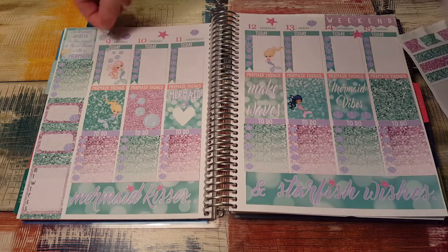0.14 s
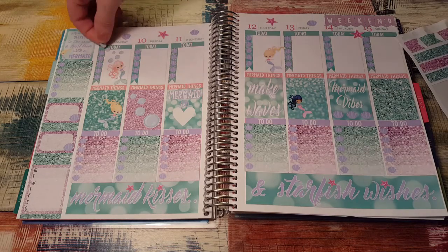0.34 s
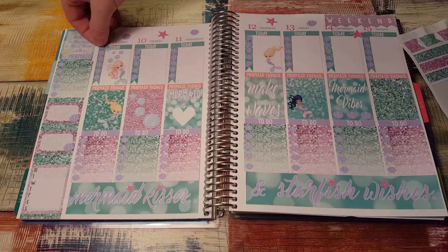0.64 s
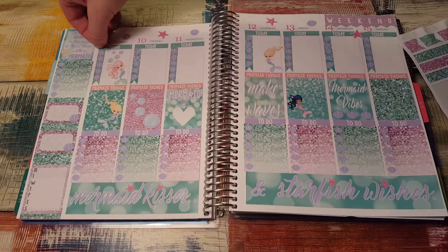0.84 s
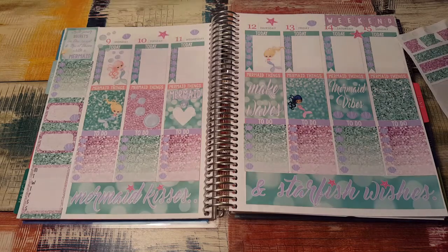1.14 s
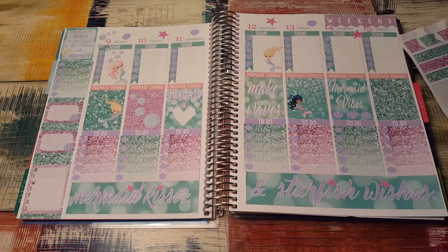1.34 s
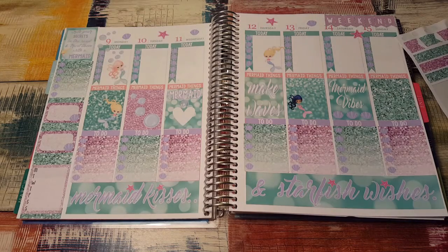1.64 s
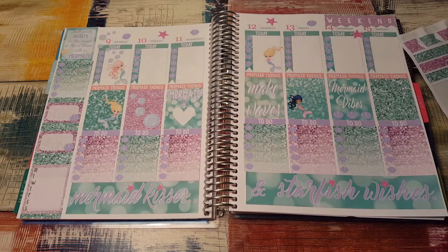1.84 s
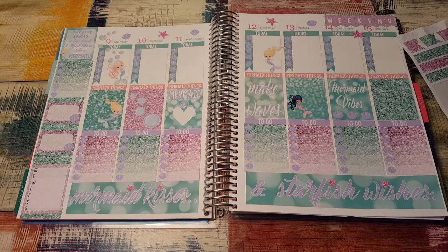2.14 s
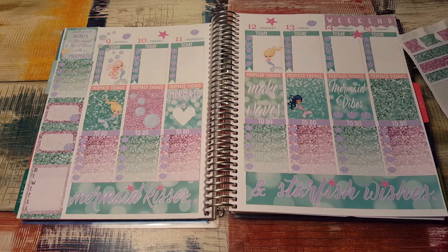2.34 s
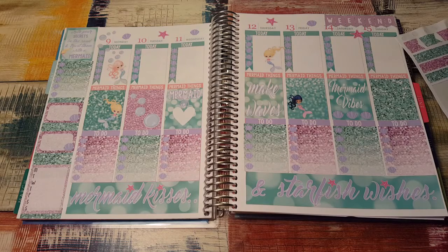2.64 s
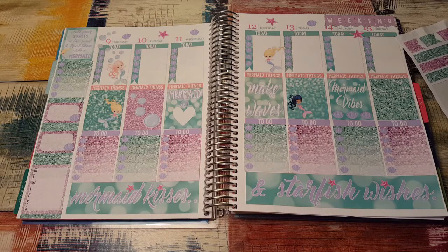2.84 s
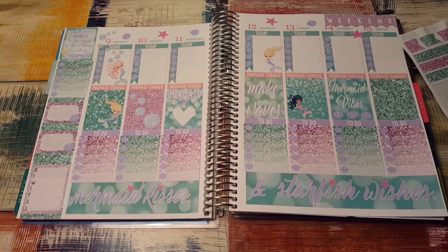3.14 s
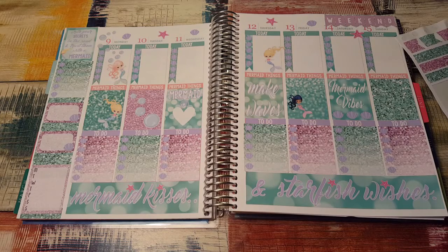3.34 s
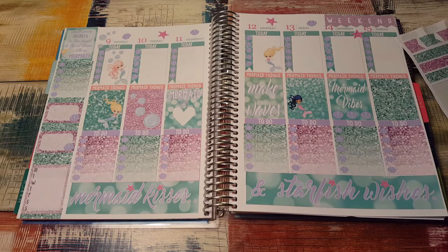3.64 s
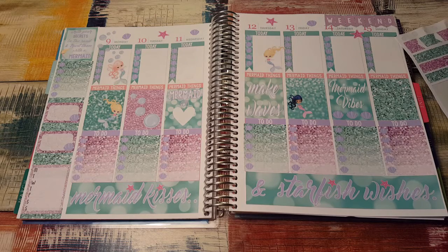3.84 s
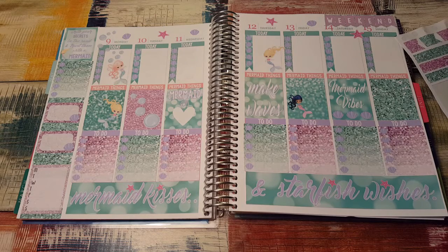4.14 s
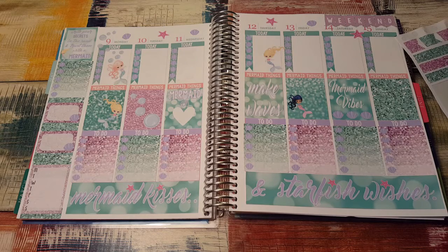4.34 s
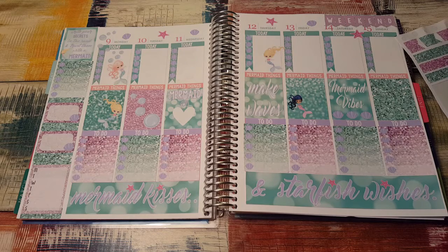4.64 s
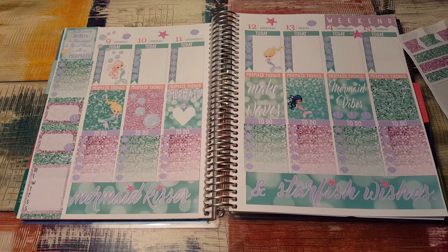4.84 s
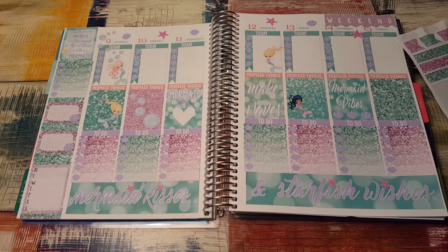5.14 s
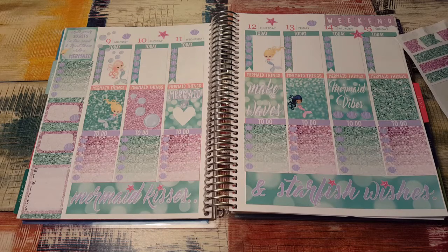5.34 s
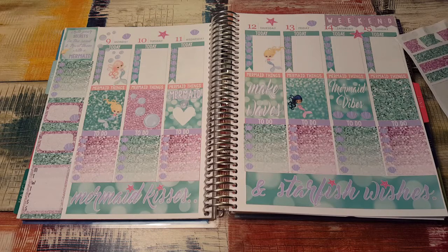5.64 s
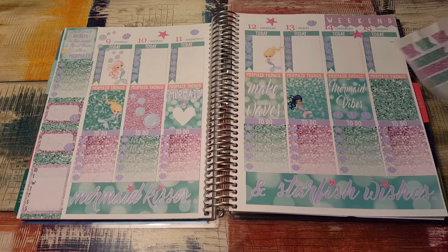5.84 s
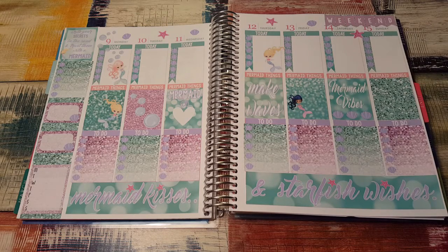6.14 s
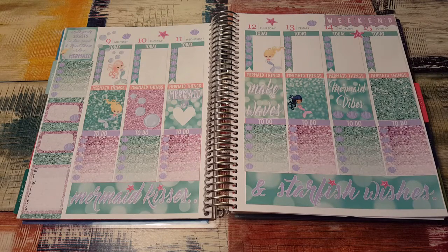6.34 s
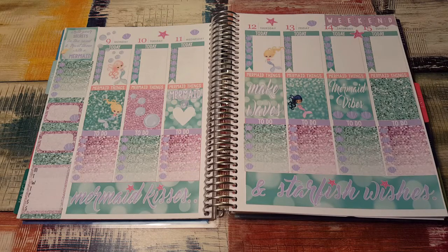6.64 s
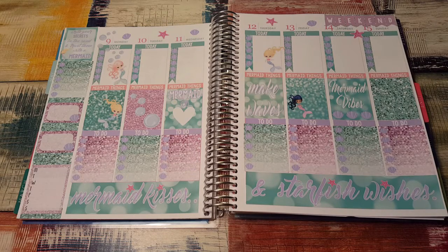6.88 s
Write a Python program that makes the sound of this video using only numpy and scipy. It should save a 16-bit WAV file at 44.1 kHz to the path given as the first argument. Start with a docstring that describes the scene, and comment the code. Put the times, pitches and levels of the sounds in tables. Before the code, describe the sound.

Thin sticker paper snaps, crinkles and slides under fingers in a quiet humming room, ending with knocks, loud crackles and a short rasping peel.

```python
"""At a table in a quiet room with a low hum, someone handles paper stickers just beside a camera.
The backing sheet buckles in small dry snaps: short noise bursts that ring, flap, tick and push air.
Fingers slide over paper as filtered noise full of tiny slips, with crinkles and a faint judder.
A sticker rasps off its backing: slips ring the taut sheet. Fingertips and the hand bump the planner
and the table now and then, which ring as fading sine tones. The room adds short reflections."""
import sys
import numpy as np
from scipy import signal
from scipy.fft import rfft, irfft, next_fast_len
from scipy.io import wavfile

SR = 44100
rng = np.random.default_rng(int(sys.argv[2]) if len(sys.argv) > 2 else 0)


def unload_wav(signal):
    """Save mono or channel-first audio to the path in sys.argv[1] as 16-bit WAV at rate SR, clipped to [-1, 1]."""
    wavfile.write(
        sys.argv[1],
        SR,
        np.round(np.clip(np.atleast_2d(signal).T, -1, 1) * 32767).astype(np.int16),
    )


N = 309141
TIME = np.arange(N) / SR  # seconds

# Snaps of the backing sheet: (time [s], level of the paper sound [dB], note of the free patch [Hz],
# ring of that note [dB], low flap over the crack [dB], bright tick over the crack [dB],
# flutter after it, before each layer's own offset [dB])
PAPER_SNAPS = [(0.003, -45.5, 754, 7, 19, 0, 8), (0.027, -44, 643, 13, 14, -19, 6),
               (0.044, -49.5, 626, 1, 19, -8, -1), (0.34, -68, 10100, 12, -6, 15, 6),
               (0.505, -73, 3900, 15, -14, -6, 0), (0.812, -62.5, 3100, 7, -19, -14, -14),
               (0.987, -49, 10500, 22, 16, 18.5, -4), (1.624, -54, 2480, 10, 2.5, -0.5, 11),
               (1.873, -53.5, 1010, -12, 17, -9, 6), (1.886, -45.5, 1540, -20, 6, -19, 6),
               (1.891, -46, 1930, -1, -6, -10.5, -7), (1.957, -55, 870, 17, 19, 6, -12),
               (2.11, -42.5, 2330, -1, 3.5, -15, 11), (2.278, -51, 3460, 8, 2.5, -1, -7),
               (2.309, -45.5, 2500, -1, -4, -19, -4), (2.886, -40.5, 1150, 10, 9, -29, -5),
               (2.895, -37, 2420, 2, 1.5, -24, -14), (2.928, -41.5, 1060, 7, 6.5, -27, -15),
               (3.221, -62.5, 1590, -1, -4, -8, -10), (3.264, -56.5, 4500, 5, -3, -1, -6),
               (3.3, -53.5, 2150, 6, 9, -2, -2), (3.308, -52, 2230, 4, -20, -14, -12),
               (3.333, -53, 2300, -8, 1, -6.5, -17), (3.398, -57.5, 2400, 8, -18, -8, 3),
               (3.466, -52.5, 2190, 6, 5, -2.5, -27), (3.927, -53, 2120, 20, -13, -10, 13),
               (3.943, -50, 2030, 22, -16, -8, -19), (3.97, -47.5, 2120, 14, 7, -28, -3),
               (4.039, -45.5, 2830, -21, -8, -10, -2), (4.144, -58, 666, 11, 11, -11, 5),
               (4.212, -51.5, 2530, 8, 5.5, 1.5, 2), (4.293, -51.5, 1550, 11, 8, -27, -6),
               (4.331, -45, 5000, 11, 0.5, -11, -2), (4.38, -37, 2010, 7, 1.5, -29, -3),
               (4.422, -51.5, 1120, -15, 23, -24, -1), (4.617, -58.5, 1460, -11, 5.5, -15, -14),
               (5.258, -50, 2540, 29, -5, -28, -2), (5.349, -44.5, 1350, 0, 6.5, -31, 3),
               (5.445, -40.5, 686, 14, 16, -14, 5), (5.467, -39.5, 900, 11, 4, -25, -10),
               (5.501, -35.5, 2650, -8, -5, -13.5, 9), (5.521, -37, 1550, 2, -3.5, -28, -2),
               (5.683, -47.5, 810, 1, 16, 6, 14), (5.7, -47, 3280, 5, -6, -5, 0),
               (5.812, -53.5, 3530, 10, -17, -6, -10), (5.913, -45.5, 2970, -3, -20, -6.5, 13),
               (5.941, -41, 2660, 1, 1.5, -4, 16), (6.06, -37.5, 1030, -13, 8.5, -14, 9),
               (6.067, -35, 850, -6, 4, -23, 6), (6.082, -41, 1630, 20, -3, -22, -16),
               (6.114, -38, 1430, -14, 17, -27, 8), (6.126, -45, 1130, 0, -5, -11.5, -3),
               (6.206, -45, 980, 15, -2, -2, 2), (6.211, -33, 1040, -5, 5, -12, 1),
               (6.22, -29.5, 825, 12, -4.5, -3.5, -10.5), (6.554, -48, 1170, 3, 10, -32, 5),
               (6.631, -46, 3170, 7, -13, 0, 8), (6.641, -30, 1540, 2, -25, -10.5, -8),
               (6.652, -43.5, 2100, 12, 3, -15, 7), (6.824, -38.5, 6490, -19, -6.5, 2, 7),
               (6.833, -36.5, 2390, 4, -6.5, -12, 9), (6.945, -49, 2080, 14, 9, -3, -2),
               (7.0, -50, 880, 12, 3.5, -2.5, 10)]
# A bigger flap pushes more air: (air over the paper sound [dB], extra air per dB of flap [dB])
AIR_DB, AIR_PER_FLAP = -13.5, 0.33

# Finger strokes over paper: (start [s], length [s], friction [dB], hiss over friction [dB],
# flexing of the sheet over friction [dB]); sliding() then trims each layer a little
FINGER_STROKES = [(0.005, 0.036, -58.5, -4.5, -2), (1.0, 0.087, -74.5, 9.5, 10),
                  (1.385, 0.15, -64, -2.5, -2), (1.835, 0.064, -72, 9.5, -8), (1.91, 0.099, -62.5, 3, 1.5),
                  (2.14, 0.098, -72, 5, 1.5), (2.33, 0.1, -62, 0.5, -2.5), (2.45, 0.14, -58.5, 6, -4),
                  (2.6, 0.078, -70, -4, 5), (2.713, 0.052, -56.5, -0.5, -10),
                  (2.786, 0.043, -54.5, 4.5, -4), (2.834, .11, -54, -6.5, 5), (2.998, .07, -60.5, -3.5, -4),
                  (3.139, 0.088, -57.5, -4, -2), (3.28, 0.095, -65, -5.5, -14), (3.41, 0.1, -67.5, -17, -2),
                  (3.54, 0.087, -71, -8, -1), (3.932, 0.02, -58, 4, -2), (4.008, 0.095, -58.5, -0.5, -9),
                  (4.22, 0.042, -72, 1, 10), (4.34, 0.083, -66.5, -20, 10), (5.06, 0.014, -71.5, 3, -6),
                  (5.259, 0.075, -55, 3, 0), (5.355, 0.033, -62.5, -7, 13), (5.415, 0.021, -56.5, 4, 3.5),
                  (5.45, 0.11, -54, -7.5, 3.5), (5.58, 0.13, -70, -2.5, 9), (5.689, 0.052, -52, -6.5, -4.5),
                  (5.78, 0.01, -56.5, -3, 0), (5.831, 0.051, -52.5, 4, 0), (5.9, 0.087, -52, 1.5, 2.5),
                  (6.015, 0.054, -46.5, 0, 4), (6.105, 0.046, -56.5, -9, -2),
                  (6.245, 0.078, -57.5, 5.5, -2.5), (6.33, 0.064, -71.5, 5.5, -4),
                  (6.448, 0.069, -61, 4.5, -3.5), (6.59, 0.12, -54.5, -2, -1), (6.93, 0.053, -59.5, 0.5, 5)]
# In every stroke the finger lands, speeds up, slows down and lifts (LAND_S and LIFT_S: time constants)
LAND_S, LIFT_S, SWELL_DB, FASTEST_SHARE = 0.017, 0.026, 4.5, 0.6
# Tone of fingers on paper fibres: (frequency [Hz], level [dB])
HISS_TONE = [(3000, -9), (5000, -7), (7000, -6.5), (8400, -2), (10000, -12), (12500, -6.5), (15000, -15.5)]
# Tone of ridges catching: (frequency [Hz], level [dB])
GRIT_TONE = [(900, -29), (1500, -5.5), (2100, 0), (2700, -1), (3600, -9.5), (5000, -11), (7000, -17)]
# Tone of the sheet flexing: (frequency [Hz], level [dB])
FLEX_TONE = [(200, 5.5), (420, 1), (680, 4), (1000, -0.5), (1400, -3.5), (2200, -27)]
# Faint judder of a dragging fingertip: (start [s], length [s], slip rate [Hz], level [dB])
FINGER_JUDDER = [(2.606, 0.07, 308, -63), (2.736, 0.067, 322, -62.5)]

# Resonances of the taut backing sheet: (frequency [Hz], width [Hz], level [dB])
BACKING_RINGS = [(630, 125, 4), (876, 65, 5), (1210, 100, -5.5), (1640, 120, 1.5), (2030, 620, -5),
                 (3280, 330, -3.5), (3860, 210, -6), (4340, 72, 0)]
# The sticker peels in one pull that slackens as it goes (attack and release: time constants)
PEEL_START_S, PEEL_END_S, PEEL_ATTACK_S, PEEL_RELEASE_S = 6.565, 6.85, 0.036, 0.16
PEEL_DB, PEEL_SAG_DB_PER_S = -49, 14

# Bumps on the planner and table: (time [s], level [dB], contact cutoff, low is soft [Hz])
HAND_BUMPS = [(0.02, -48, 169), (0.044, -55, 200), (0.387, -65, 70), (0.935, -54.5, 70), (0.989, -44, 600),
              (0.997, -42.5, 65), (1.025, -49, 250), (1.89, -55.5, 109), (2.278, -55, 700),
              (2.388, -60.5, 100), (2.623, -61, 200), (2.89, -45, 186), (5.78, -33.5, 604),
              (5.841, -38, 990), (5.854, -34.5, 403), (5.878, -42, 400), (6.063, -46, 100),
              (6.211, -40, 95), (6.328, -50.5, 600), (6.824, -51.5, 150), (6.94, -51.5, 150)]
# Modes of the table: (frequency [Hz], level [dB], time to fade by 60 dB [s])
TABLE_MODES = [(88, -37, 0.7), (129.4, -11, 0.23), (180, -10.5, 0.35), (217.4, -7, 0.17),
               (257.6, -0.5, 0.23), (331.8, -1, 0.2), (362, -3.5, 0.13), (399, -0.5, 0.15), (630, -2, 0.12),
               (861, -0.5, 0.065), (1040, -8, .1), (1170, -16.5, 0.092)]

# Where the hands work: (time [s], lag of the left microphone [samples], left minus right [dB])
HAND_PLACES = [(0, 15, -3), (.4, 5, 1), (1, -7, 2), (1.4, 18, -3), (2.2, 17, -5), (2.9, 16, -10.5),
               (3.4, 16, -8), (4.1, 18, -4.5), (5.3, 11, -.5), (6.05, 10, -1.5), (6.25, 14, -3),
               (6.6, 16, -4.5), (7, 16, -4)]

# Shape of the air noise in the room: (frequency [Hz], relative density [dB per Hz])
AIR_TONE = [(20, -31), (35, -13), (48, -8.5), (62, -12), (120, -12), (170, -14.5), (205, -14), (262, -10.5),
            (310, -16.5), (450, -19.5), (640, -20.5), (1050, -27), (6400, -39.5), (15000, -41.5)]
# Hum of an appliance: (frequency, about which it drifts [Hz], level [dB])
HUM_TONES = [(48.4, -79), (119.5, -78), (263, -69)]
ROOM_DB = -66.5
TOP_HZ = 14800


def snaps(scatter=0.93):
    """All the snaps of the sheet, heard straight and scattered by the pages."""
    times, lags, _ = np.transpose(HAND_PLACES)
    out = np.zeros((2, N))
    for time, level_db, ring_hz, ring_db, flap_db, tick_db, flutter_db in PAPER_SNAPS:
        air_db = AIR_DB + AIR_PER_FLAP * flap_db
        straight, left, right = snap(ring_hz, ring_db, air_db, flap_db, tick_db, flutter_db)
        lag = int(np.interp(time, times, lags))
        # the hand's position sets which microphone hears it first
        pair = np.array([np.pad(straight, (max(delay, 0), 0))[:len(straight)] for delay in (lag, -lag)])
        pair = pair + scatter * np.array([left, right])
        pair = pair * np.std(straight) / np.std(pair, axis=1, keepdims=True)
        add(out, time, undb(level_db) * pair)
    return out


def snap(ring_hz, ring_db, air_db, flap_db, tick_db, flutter_db, ring_q=6, bounce=0.53):
    """One snap: a crack that rings in the free patch of paper, a flap, a bright tick and a push of air."""
    t = np.arange(int(.16 * SR)) / SR
    gap = int(rng.uniform(.0007, 0.001943) * SR)

    def even(x):
        """Unit rms over the first 20 ms."""
        return x / np.sqrt(np.mean(x[:, t < .02] ** 2, axis=1, keepdims=True))

    def ringing(x):
        """Lift the patch's own note, and add the bounce off the table top."""
        x = x + undb(ring_db) * resonate(x, ring_hz, ring_hz / ring_q)
        return x + bounce * np.pad(x, ((0, 0), (gap, 0)))[:, :len(t)]

    crack = band(buckle(t, 0.0027, 0.0093, flutter_db - 5.5, -15.0), 1300, 3730)
    crack = even(ringing(crack))
    flap = band(buckle(t, 0.00089, 0.011, flutter_db, -7), 456, 1674)
    flap = even(ringing(flap))
    tick = band(buckle(t, 0.0022, 0.017, flutter_db - 4.0, -2), 4130, 19845)
    tick = band(tick, 2300, 6100, order=1)
    tick = even(ringing(tick + 0.63 * resonate(tick, 8520, 910)))
    air = even(band(buckle(t, 0.0046, 0.027, -9, -9), 117, 458))
    paper = even(crack + undb(flap_db) * flap + undb(tick_db) * tick)
    return paper + undb(air_db) * air


def buckle(t, fast_s, slow_s, tail_db, crack_db):
    """A crease cracks in a quick burst, then the sheet flutters on in uneven kinks; three paths."""
    envelope = np.exp(-t / fast_s) + undb(tail_db) * np.exp(-t / slow_s)
    # 600 random levels a second make the burst uneven
    kinks = np.interp(t * 600, np.arange(len(t)), rng.standard_normal(len(t)))
    burst = rng.standard_normal((3, len(t))) * envelope * undb(2.7 * kinks)
    # the crack is a single click on the straight path
    burst[0, 0] += undb(crack_db) * np.sqrt(np.sum(burst[0] ** 2))
    return burst


def sliding(grit_gain, hiss_gain, flex_gain, hiss_db=-1, grit_db=-1.0, flex_db=-2.0):
    """Fingers slide over paper: fibres hiss, ridges catch and the sheet flexes under them."""
    brush = friction(grain_db=-3.0, slips_per_s=4000, waver_db=2.0)
    hiss = undb(hiss_db) * hiss_gain * unit(colour(brush, HISS_TONE))
    drag = friction(grain_db=3.5, slips_per_s=1500, waver_db=0.8)
    grit = undb(grit_db) * grit_gain * unit(colour(drag, GRIT_TONE))
    flex = undb(flex_db) * flex_gain * unit(colour(drag, FLEX_TONE))
    return microphones(hiss + grit + flex, shared=0.11)


def friction(grain_db, slips_per_s, waver_db):
    """Dense tiny slips of uneven size over a smooth hiss, swelling as the grip changes; three paths."""
    happens = rng.random(N) < slips_per_s / SR
    size = undb(grain_db * np.minimum(rng.exponential(size=N), 4))
    grit = unit(happens * size * rng.standard_normal((3, N)))
    return (rng.standard_normal((3, N)) + 0.52 * grit) * undb(waver_db * walk(70))


def rubbing():
    """Gains of friction, hiss and flexing: the powers of all the strokes add up."""
    rows = np.array(FINGER_STROKES)
    power = np.array([stroke(start, length) * undb(db) for start, length, db in rows[:, :3]]) ** 2
    grit_power = power.sum(0)
    hiss_power = undb(rows[:, 3]) ** 2 @ power
    flex_power = undb(rows[:, 4]) ** 2 @ power
    return np.sqrt([grit_power, hiss_power, flex_power])


def stroke(start_s, length_s):
    """Gain of one finger stroke, loudest where the finger moves fastest."""
    end_s = start_s + length_s
    fastest_s = start_s + FASTEST_SHARE * length_s
    speed = np.sin(np.pi / 2 * np.interp(TIME, [start_s, fastest_s, end_s], [0, 1, 0]))
    return gate(start_s, end_s, LAND_S, LIFT_S) * undb(SWELL_DB * (speed - 1))


def crinkles(grit_gain, kinks_per_s=190, size_db=4.0, level_db=-5):
    """While the paper is worked, tiny kinks give way at random, louder the harder it is rubbed."""
    t = np.arange(int(.015 * SR)) / SR
    out = np.zeros((3, N))
    for when, size, note in rng.random((int(kinks_per_s * N / SR), 3)):
        kink = resonate(buckle(t, 0.00055, 0.0017, -9, -15.5), 1300 * 6 ** note, 1100)
        kink_db = -size_db * np.log(1 - .95 * size)  # many small kinks, few large
        add(out, when * N / SR, undb(kink_db) * unit(kink))
    out = unit(band(out, 700, 11000, order=2))
    return microphones(undb(level_db) * grit_gain * out, shared=0.39)


def judder(jitter=0.0297, octave_db=-12):
    """Skin sticks and slips at an unsteady rate: a wobbling tone and its octave."""
    out = 0
    for start, length, hz, db in FINGER_JUDDER:
        phase = 2 * np.pi * np.cumsum(hz * (1 + jitter * walk(120))) / SR
        tone = unit(np.sin(phase) + undb(octave_db) * np.sin(2 * phase))
        out = out + undb(db) * stroke(start, length) * tone
    return out * undb(2 * walk(39.9))


def peeling(hiss_db=-14, edge_hz=4600):
    """Glue lets go in countless small slips that ring the taut backing sheet."""
    slips = friction(grain_db=1.5, slips_per_s=2800, waver_db=2)
    rasp = 0
    for k, (hz, width_hz, db) in enumerate(BACKING_RINGS):
        # neighbouring resonances swing in opposite directions
        rasp = rasp + (-1) ** k * undb(db) * resonate(slips, hz, width_hz)
    rasp = band(rasp, 370, edge_hz, order=6)
    hiss = colour(slips, HISS_TONE)
    pull = gate(PEEL_START_S, PEEL_END_S, PEEL_ATTACK_S, PEEL_RELEASE_S)
    pull = pull * undb(PEEL_DB - PEEL_SAG_DB_PER_S * np.maximum(TIME - PEEL_START_S, 0))
    return microphones(pull * (unit(rasp) + undb(hiss_db) * unit(hiss)), shared=0.39)


def bumps(thud_db=-14, pan_db=-1.0, scatter=0.67, low_hz=92):
    """Soft blows ring the table's modes; a softer contact leaves out the higher ones."""
    t = np.arange(int(.35 * SR)) / SR
    hz, db, t60 = np.transpose(TABLE_MODES)[:, :, None]
    out = np.zeros((2, N))
    for start, level_db, contact_hz in HAND_BUMPS:
        # each blow varies the modes' pitch and strength a little
        detune, spot = rng.standard_normal((2, len(TABLE_MODES), 1))
        tones = np.sin(2 * np.pi * hz * (1 + .015 * detune) * t)
        modes = undb(db + 1.5 * spot) * tones * 1000 ** (-t / t60)
        thud = band(rng.standard_normal((3, len(t))) * np.exp(-t / 0.012), 110, 810, order=2)
        blow = unit(modes.sum(0)) + undb(thud_db) * unit(thud[0]) + scatter * unit(thud[1:])
        blow = signal.sosfilt(signal.butter(2, contact_hz, fs=SR, output='sos'), blow)
        # the table top is too small to radiate deep bass
        blow = signal.sosfilt(signal.butter(4, low_hz, 'high', fs=SR, output='sos'), blow)
        blow = blow / np.std(blow[:, t < .02])
        add(out, start, -undb(level_db) * sides(pan_db) * blow)  # minus: the wave starts the other way
    return out


def reflections(x, wet_db=-14, t60=0.22):
    """A furnished room answers briefly and dully: the sound is smeared by a fading noise tail."""
    t = np.arange(int(.4 * SR)) / SR
    fade = np.exp(-np.log(1000) * t / t60) * (1 - np.exp(-(t / 0.001) ** 2))
    tail = rng.standard_normal((2, len(t))) * fade
    tail /= np.sqrt(np.sum(tail ** 2, axis=1, keepdims=True))
    tail = band(tail, 140, 8100, order=1)
    return undb(wet_db) * signal.fftconvolve(x, tail, axes=1)[:, :N]


def room_tone(wide_hz=520, hum_drift_hz=1.65):
    """Steady air noise, more alike on both sides in the bass, and an appliance hum of wavering pitch."""
    mid, side = rng.standard_normal((2, N))
    treble = signal.sosfilt(signal.butter(2, wide_hz, 'high', fs=SR, output='sos'), side)
    side = 0.48 * side + 0.57 * treble
    mid, side = colour(mid, AIR_TONE), colour(side, AIR_TONE)
    air = undb(ROOM_DB) * np.array([mid + side, mid - side]) / np.std(mid)
    hum = 0
    for hz, db in HUM_TONES:
        phase = 2 * np.pi * np.cumsum(hz + hum_drift_hz * walk(24.98)) / SR
        hum = hum + undb(db) * np.sqrt(2) * np.sin(phase)
    return air + hum


def microphones(three, shared):
    """Row 0 goes straight, with a lag on the left; rows 1 and 2 are each side's scattered sound."""
    times, lags, _ = np.transpose(HAND_PLACES)
    lag = np.round(np.interp(TIME, times, lags))
    left = np.interp(np.arange(N) - lag, np.arange(N), three[0])
    straight = np.array([left, three[0]])
    return np.sqrt(shared) * straight + np.sqrt(1 - shared) * three[1:]


def sides(pan_db):
    """Left and right gains of constant power."""
    gains = undb(np.array([pan_db, -pan_db]).reshape(2, -1) / 2)
    return gains / np.sqrt(np.mean(gains ** 2, axis=0))


def gate(start_s, end_s, attack_s, release_s):
    """Gain that swells up to the start, holds to the end and dies away."""
    before = np.maximum(start_s - TIME, 0)
    after = np.maximum(TIME - end_s, 0)
    return np.exp(-before / attack_s - after / release_s)


def walk(rate):
    """Smooth random drift with a spread near one, through this many random points a second."""
    knots = rng.standard_normal(int(N / SR * rate) + 2)
    return 1.2 * np.interp(TIME * rate, np.arange(len(knots)), knots)


def colour(x, points):
    """Filter by a spectrum of (frequency [Hz], level [dB]) points."""
    hz, db = np.transpose(points)
    size = next_fast_len(N)
    f = np.maximum(np.arange(size // 2 + 1) * SR / size, 1)
    gain = undb(np.interp(np.log(f), np.log(hz), db, left=-70, right=-70))
    return irfft(rfft(x, size) * gain, size)[..., :N]


def band(x, lo_hz, hi_hz, order=3):
    """Band-pass: keep what lies between two frequencies."""
    return signal.sosfilt(signal.butter(order, [lo_hz, hi_hz], 'band', fs=SR, output='sos'), x)


def resonate(x, hz, width_hz):
    """One resonance, gain 1 at its centre."""
    return signal.lfilter(*signal.iirpeak(hz, hz / width_hz, fs=SR), x)


def add(out, t, sound):
    """Mix a sound in at time t."""
    i = max(int(t * SR), 0)
    out[..., i:i + sound.shape[-1]] += sound[..., :max(N - i, 0)]


def undb(db):
    """Decibels to gain."""
    return 10 ** (np.asarray(db) / 20)


def unit(x):
    """Scale to an rms (average strength) of one."""
    return x / np.sqrt(np.mean(x ** 2) + 1e-30)


def scene():
    """Hands, paper and table in the room."""
    times, _, pan_db = np.transpose(HAND_PLACES)
    grit_gain, hiss_gain, flex_gain = rubbing()
    fingers = sliding(grit_gain, hiss_gain, flex_gain) + crinkles(grit_gain) + judder()
    paper = snaps() + fingers + peeling()
    near = paper * sides(np.interp(TIME, times, pan_db)) + bumps()
    return near + reflections(near) + room_tone()


def record(dry):
    """The camera cuts the highest treble with a steep low-pass."""
    return signal.sosfilt(signal.ellip(10, .2, 70, TOP_HZ, fs=SR, output='sos'), dry)


dry = scene()
out = record(dry)
unload_wav(out)
```